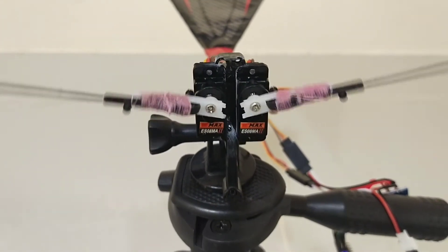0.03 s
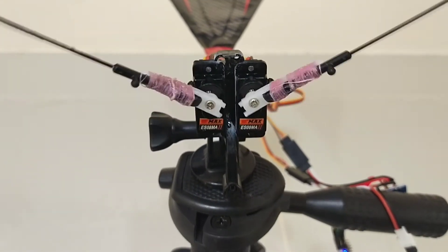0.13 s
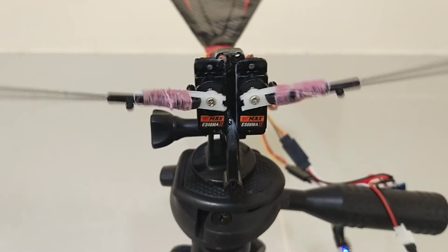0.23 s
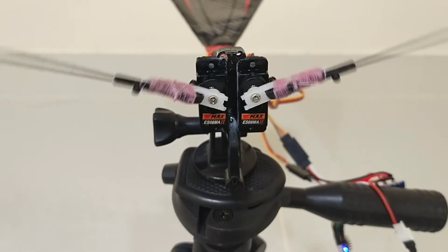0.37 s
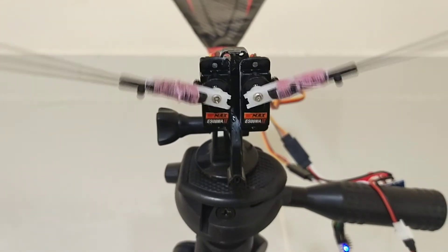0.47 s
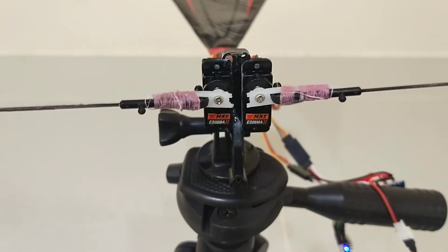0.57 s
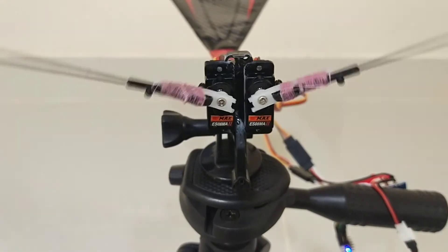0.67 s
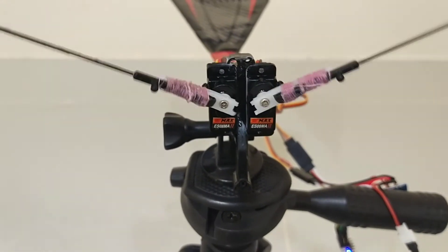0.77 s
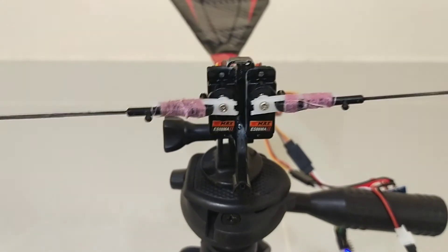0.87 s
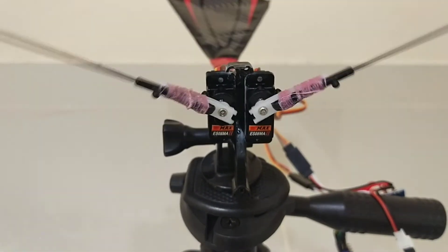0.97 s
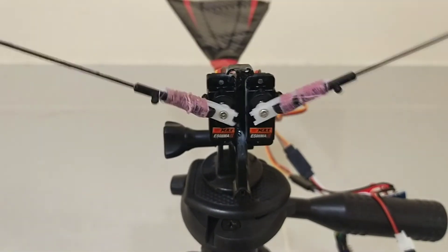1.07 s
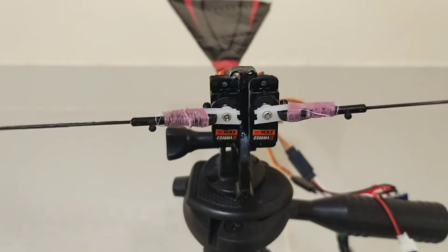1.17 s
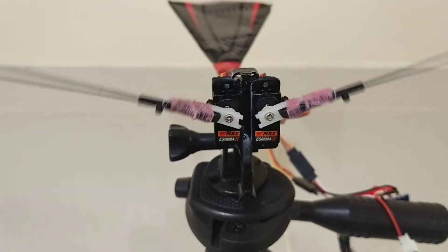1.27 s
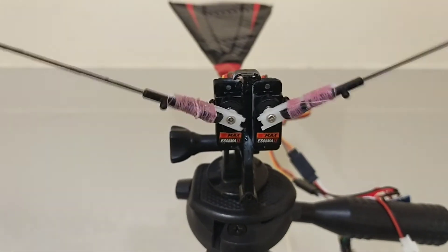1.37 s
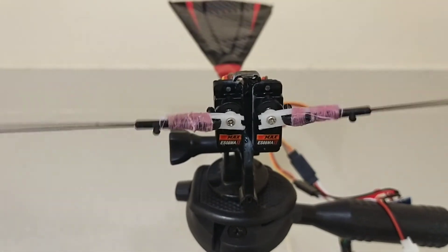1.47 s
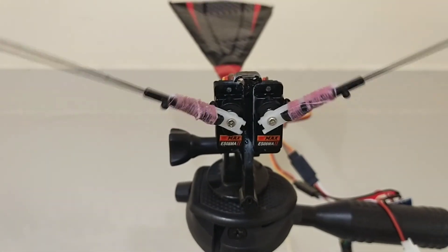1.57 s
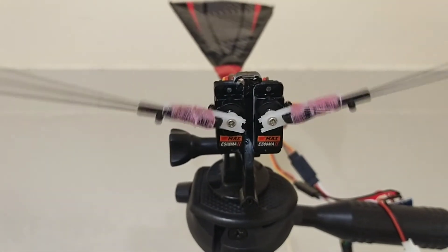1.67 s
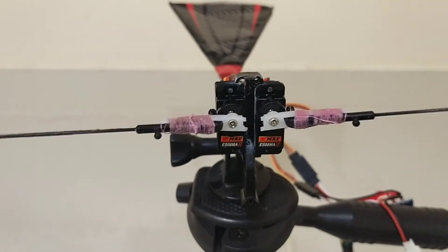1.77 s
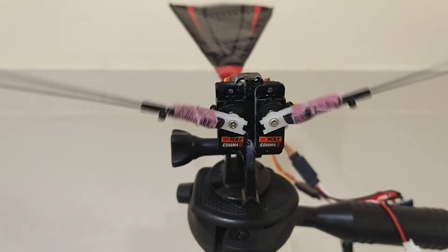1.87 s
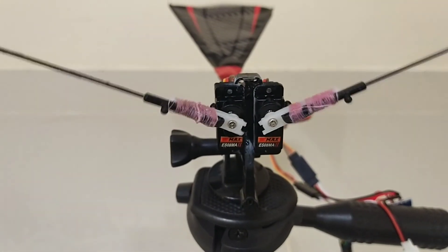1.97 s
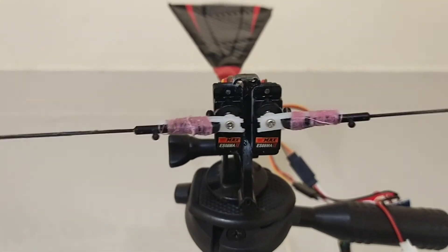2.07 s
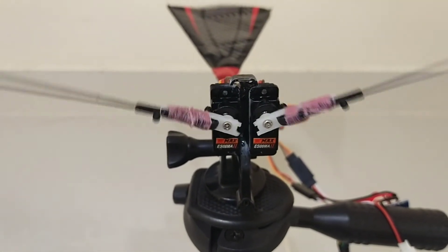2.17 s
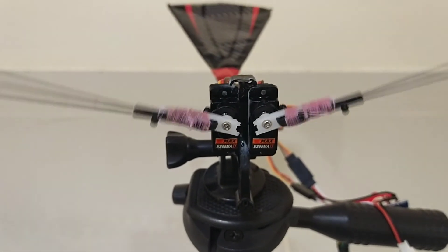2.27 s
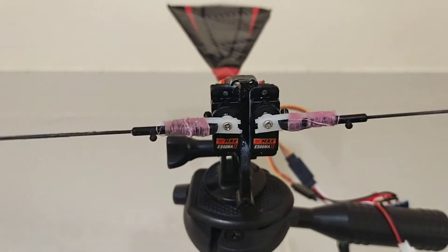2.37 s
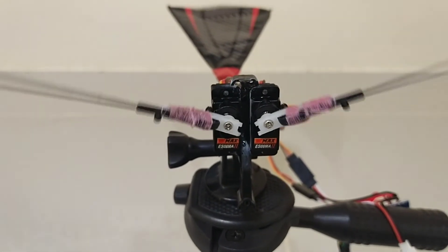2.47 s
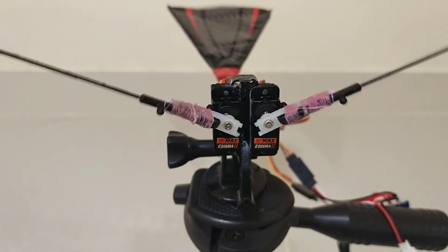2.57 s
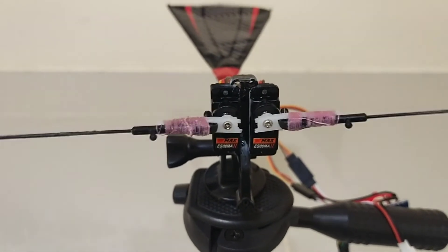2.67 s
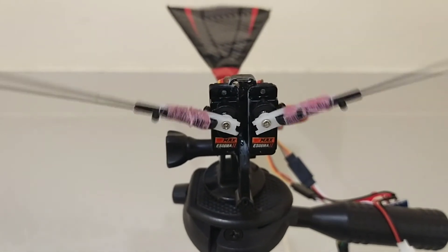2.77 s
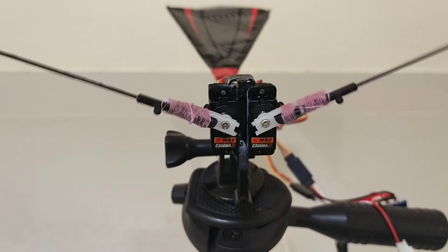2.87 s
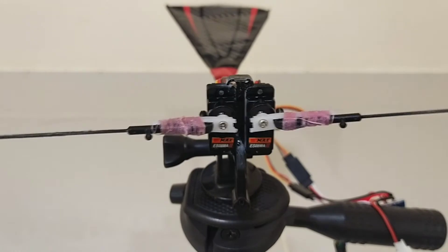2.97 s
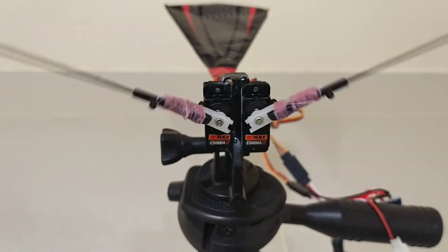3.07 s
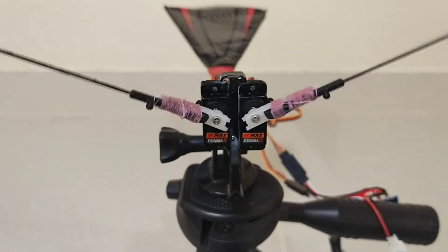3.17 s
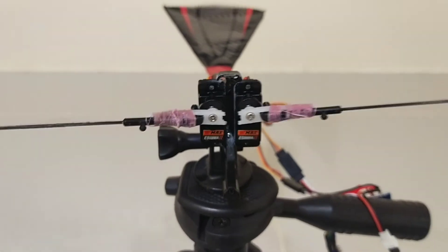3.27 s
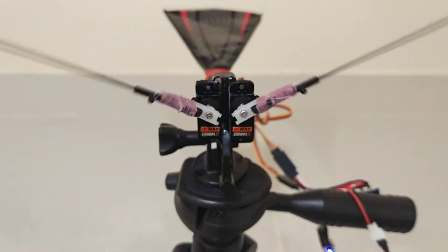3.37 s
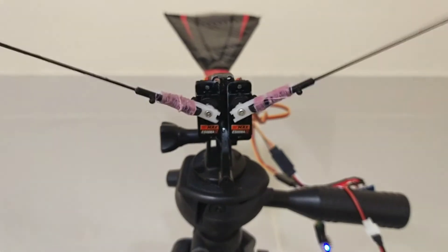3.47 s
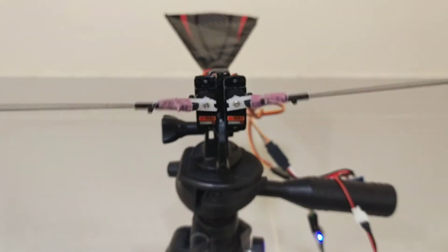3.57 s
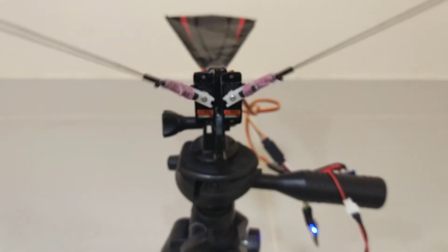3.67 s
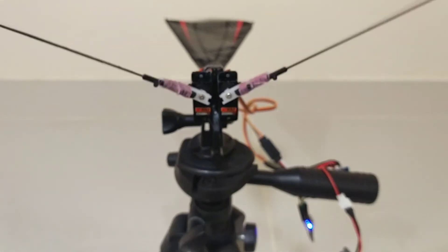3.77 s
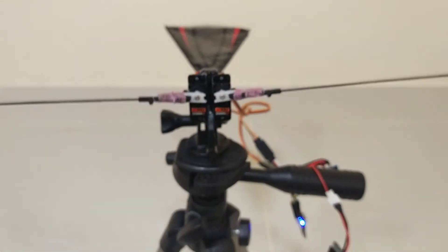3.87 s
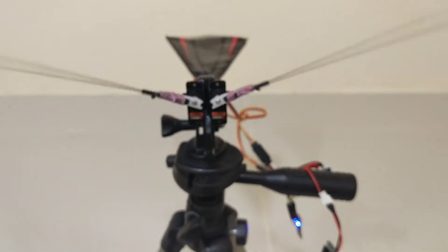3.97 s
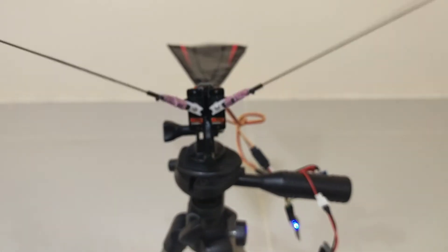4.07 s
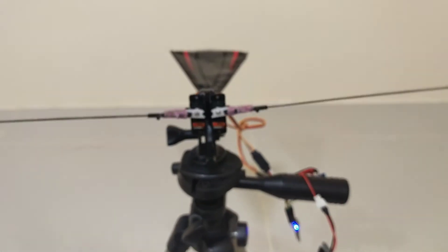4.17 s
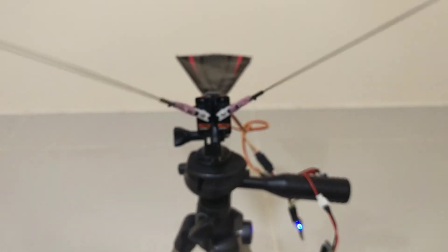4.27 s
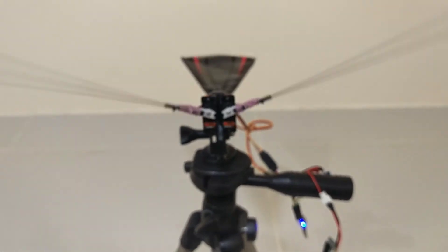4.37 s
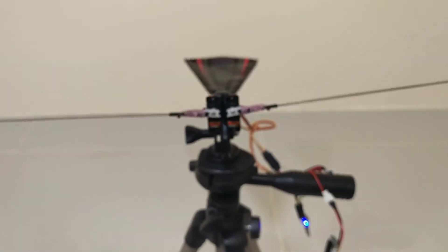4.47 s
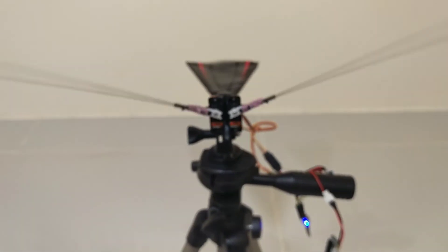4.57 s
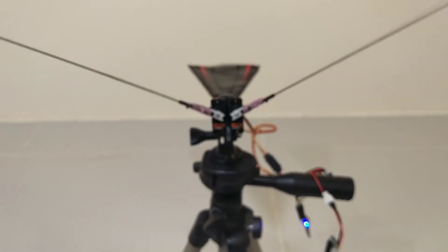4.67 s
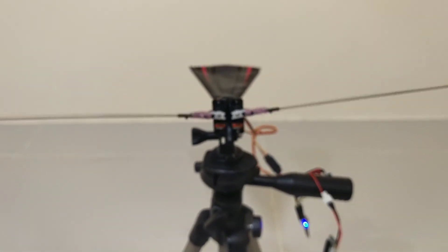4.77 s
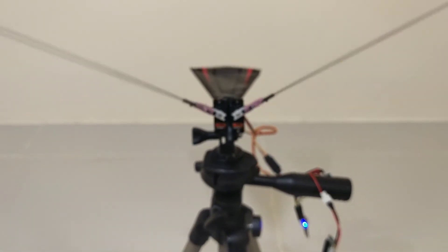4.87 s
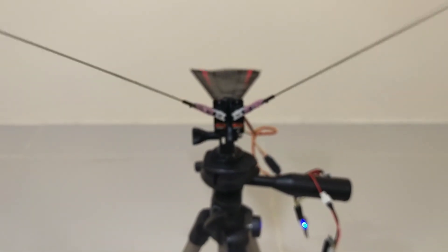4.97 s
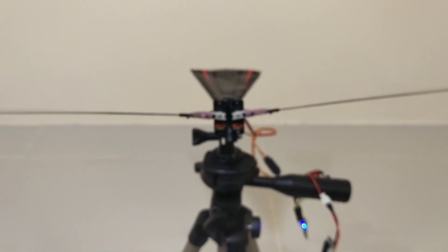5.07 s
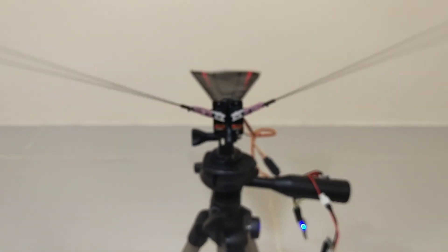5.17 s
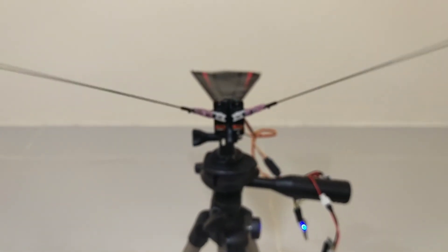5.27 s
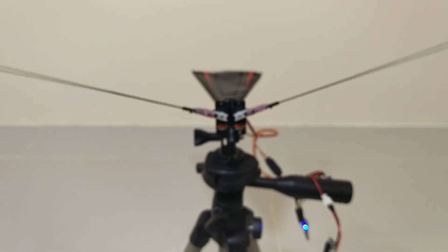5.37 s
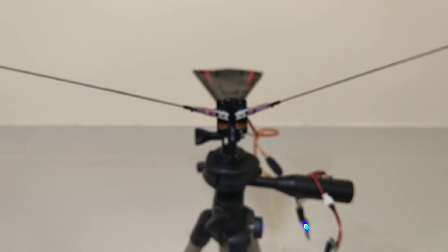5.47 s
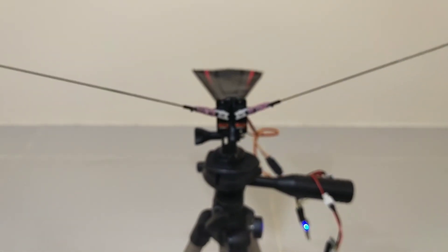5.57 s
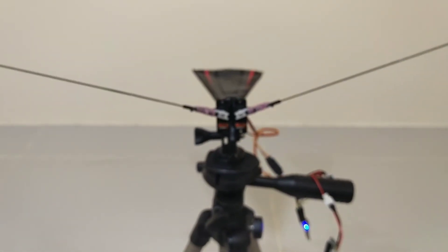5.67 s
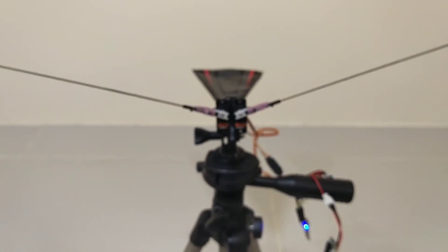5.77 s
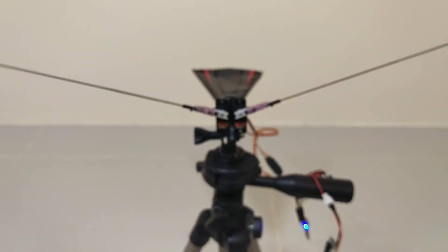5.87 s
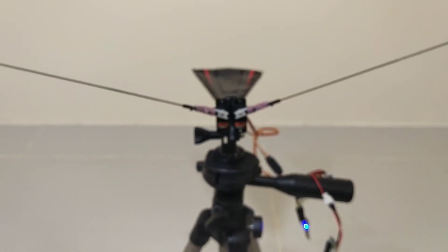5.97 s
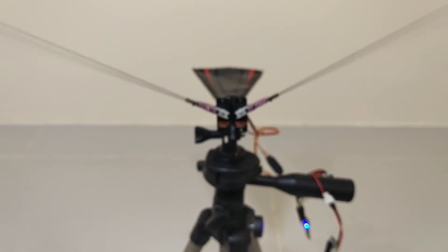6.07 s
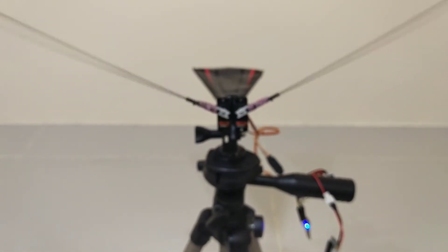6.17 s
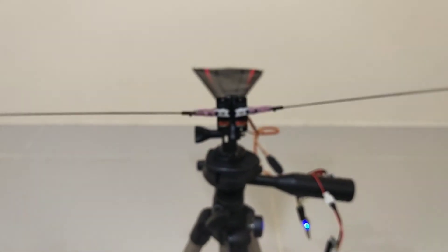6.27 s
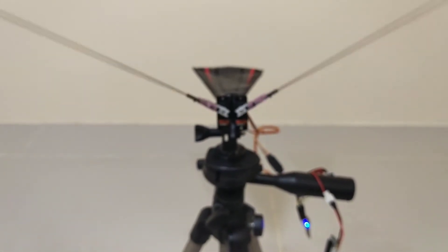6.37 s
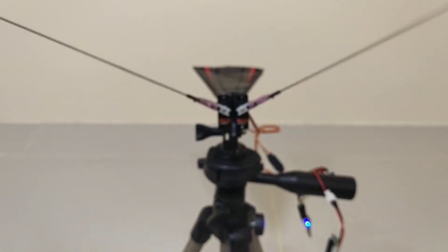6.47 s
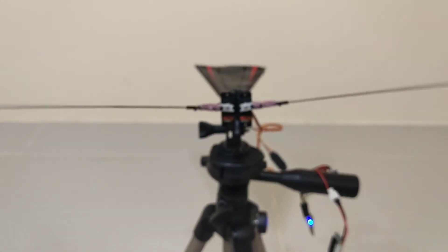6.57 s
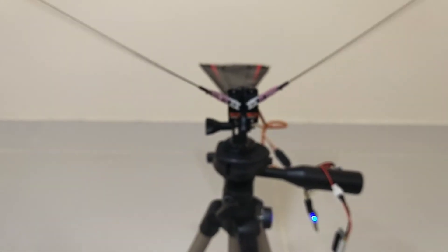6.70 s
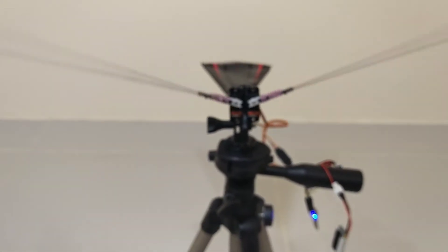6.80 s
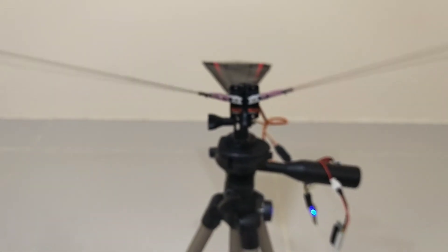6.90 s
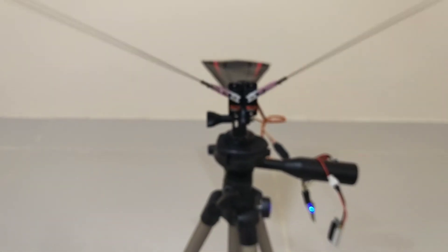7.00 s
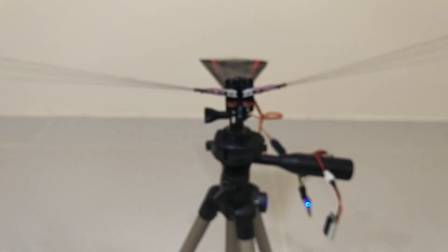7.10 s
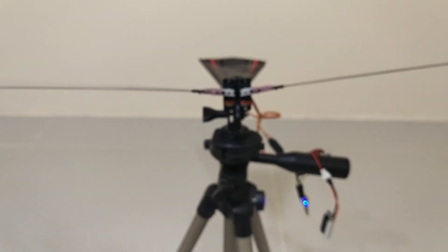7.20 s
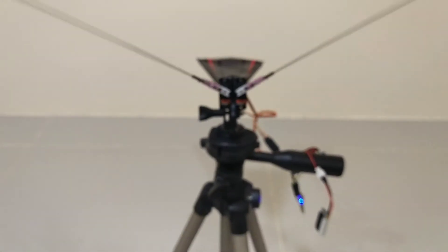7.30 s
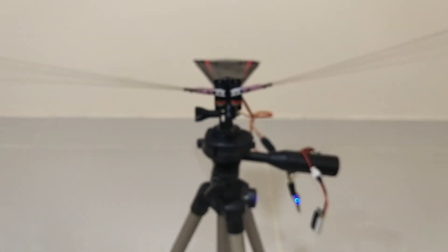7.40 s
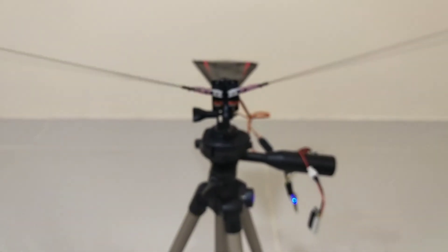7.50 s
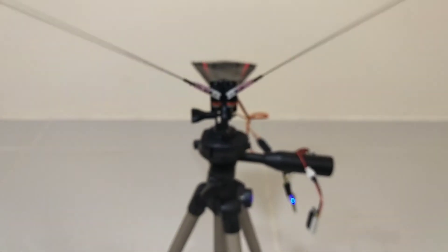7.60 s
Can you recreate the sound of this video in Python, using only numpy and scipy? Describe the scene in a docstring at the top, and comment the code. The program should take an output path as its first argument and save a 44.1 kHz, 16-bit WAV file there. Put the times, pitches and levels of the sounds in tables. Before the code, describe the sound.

From 0 s, two micro servos drive a pair of thin spars up and down close to a hand-held stereo phone in a bare room. The sound is a loud, dry, gritty buzz, about three full flaps a second, each with two uneven whirring bursts as the motors spin up and brake. Bright ringing of plastic cases around 7 to 8 kHz and fizzing gears dominate, overloading slightly. From about 2.4 s the rasp steadily softens as the phone retreats, becoming much quieter by 4 to 5 s. Around 5.15 s the motors cut and coast down, leaving steady hush, soft low floor rumble with muffled thuds, a faint hum near 5.4 s and tiny gear whispers. At about 5.97 s the flapping snaps back, swelling by 6.3 s, somewhat more even and still below the opening loudness, continuing until cut off near 7.6 s.

```python
"""First a close, buzzing flap-flap: two micro servos swing a pair of wing spars up and down, in a bare room.
A hand-held phone with two microphone ports backs away; the servos stop briefly, then restart louder.
In every stroke the motors spin up and brake; gear noise pulses once and three times a turn and rings
plastic cases and frame. Behind it lie a soft floor rumble with thuds, a steady hush and one faint hum.
The room answers, and the loudest strokes push the phone's input into gain control and clipping."""
import sys
import numpy as np
from scipy import signal
from scipy.fft import rfft, irfft, next_fast_len
from scipy.io import wavfile
from scipy.ndimage import uniform_filter1d, map_coordinates

SR = 44100
rng = np.random.default_rng(int(sys.argv[2]) if len(sys.argv) > 2 else 0)


def wrap_up_sound(samples):
    """Save the sound to the file named by the first command line argument, as 16-bit audio."""
    columns = np.atleast_2d(samples).T
    # keep every value between -1 and 1, then stretch to whole-number steps
    tamed = np.clip(columns, -1, 1)
    steps = np.round(tamed * 32767).astype(np.int16)
    wavfile.write(sys.argv[1], SR, steps)


N = 336924
TIME = np.arange(N) / SR  # s


def amp(db):
    """Level in dB to amplitude factor."""
    return np.exp(np.asarray(db) * np.log(10) / 20)


def unit(x):
    """Scale each row to an RMS of one."""
    return x / np.sqrt(np.mean(x ** 2, axis=-1, keepdims=True) + 1e-20)


def along(points, hz):
    """Read (f/Hz, value) points on a log frequency axis."""
    f, v = np.transpose(points)
    return np.interp(np.log(hz + 1), np.log(f + 1), v)


def curves(rows, t=TIME):
    """One value per sample for each column after the time."""
    seconds, *columns = np.transpose(rows)
    return [np.interp(t, seconds, column) for column in columns]


def wobble(rate, channels=1):
    """Random curves with `rate` knots a second, joined by straight lines."""
    knots = rng.standard_normal((channels, int(N * rate / SR) + 2))
    return np.array([np.interp(TIME * rate, np.arange(len(k)), k) for k in knots])


def swells(rows):
    """Sum of humps, each 10 dB under its peak one rise before and one fall after it."""
    total = np.zeros(N)
    for peak_s, db, rise, fall in rows:
        distance = np.where(TIME < peak_s, (peak_s - TIME) / rise, (TIME - peak_s) / fall)
        total += amp(db - 10 * distance)
    return total


def filtered(x, response):
    """Multiply the spectrum of x by a complex response of frequency."""
    m = next_fast_len(N + SR // 2)
    return irfft(rfft(x, m) * response(np.fft.rfftfreq(m, 1 / SR)), m)[..., :N]


def resonances(modes):
    """Responses of (f/Hz, width/Hz, level/dB, ..) modes, one per level column; each mode acts twice: steep skirts."""
    def response(f):
        total = 0
        for k, (centre, width, *db) in enumerate(modes):
            damping = 1j * f * width * np.sqrt(2)  # widened, since squaring narrows the peak
            mode = (damping / (centre * centre - f * f + damping)) ** 2
            total = total + amp(db)[:, None, None] * mode * (-1) ** k  # neighbours alternate in sign
        return total
    return response


# Footsteps and handling thuds: t/s of the peak, level/dB before the left-right lean, rise t/s, fall t/s
STEPS_AND_HANDLING = [(.06, -48, 0.084, 0.073), (.4, -51.5, 0.086, 0.17), (1.05, -59, 0.087, 0.069),
                      (1.54, -52, .04, 0.047), (2.7, -53.5, 0.21, 0.4), (3.58, -61, 0.03, 0.22),
                      (4.21, -64, 0.084, 0.13), (4.82, -62.5, 0.22, 0.057), (5.02, -54, 0.044, 0.11),
                      (5.28, -55.5, .07, 0.087), (5.58, -60.5, 0.088, 0.36), (6.47, -54, 0.086, 0.13),
                      (6.94, -57.5, 0.042, .12), (7.34, -54, 0.056, 0.21)]
# Colour of the floor rumble: f/Hz, relative level/dB per Hz
RUMBLE_COLOUR = [(20, -41.5), (35, -11.5), (55, 3), (90, 1), (135, -3.5), (200, -25), (300, -51)]
RUMBLE_DB, RUMBLE_SWAY_DB = -74, 5  # before the lean


def floor_rumble():
    """Low-passed noise, nearly alike at both ports, sways in level and swells with every step or bump."""
    a = rng.standard_normal((2, N))
    nearly_alike = a[0] + 0.32 * a[1] * [[1], [-1]]
    level = swells(STEPS_AND_HANDLING) + amp(RUMBLE_DB + RUMBLE_SWAY_DB * wobble(4.1))
    return level * unit(filtered(nearly_alike, lambda hz: amp(along(RUMBLE_COLOUR, hz))))


# Colour of the steady hush: f/Hz, relative level/dB per Hz
HUSH_COLOUR = [(25, -47), (60, -6.5), (130, -5), (250, -8), (500, -17.5), (850, -27.5), (1500, -26),
               (1950, -22), (2150, -8), (2400, -23.5), (5000, -23), (9000, -28), (11000, -21.5),
               (12500, -29), (15600, -31.5)]
# How alike the hush is at the two ports: f/Hz, left-right likeness (1 = same)
HUSH_LIKENESS = [(60, 1), (250, 0.73), (600, .1)]
HUSH_DB = -65.5  # before the lean


def steady_hush():
    """Coloured noise; mid and side shares set how alike the ports are at each frequency."""
    angle = lambda hz: np.arccos(np.clip(along(HUSH_LIKENESS, hz), -1, 1)) / 2
    shares = lambda hz: amp(along(HUSH_COLOUR, hz)) * [np.cos(angle(hz)), np.sin(angle(hz))]
    mid, side = filtered(rng.standard_normal((2, N)), shares)
    return amp(HUSH_DB) * unit(np.array([mid + side, mid - side]))


# The faint hum's swell: t/s of the peak, level/dB before wavering and lean, rise t/s, fall t/s
HUM_SWELL = [(5.37, -62.5, 0.041, 0.15)]
HUM_HZ, HUM_SAG_HZ_PER_S, HUM_BLUR_HZ = 500, 60, 30  # pitch at the peak, fall, random spread


def faint_hum():
    """One sine whose pitch sags and jitters while its strength wavers."""
    hum_hz = HUM_HZ - HUM_SAG_HZ_PER_S * (TIME - HUM_SWELL[0][0]) + HUM_BLUR_HZ * wobble(140)[0]
    waver = 1.15 + 0.8 * wobble(90)
    return swells(HUM_SWELL) * waver * np.sin(2 * np.pi * np.cumsum(hum_hz) / SR)


def background():
    """Rumble, hush and hum add up, stronger at the left port."""
    left_right_lean = amp([[1.6], [-1.6]])
    return (floor_rumble() + steady_hush() + faint_hum()) * left_right_lean


# The bare room's walls: f/Hz, decay t/s for 60 dB, level of the answer/dB
WALL_ANSWER = [(1004, 0.63, -7), (2523, 0.16, -4), (6830, 0.26, -9.5), (15000, 0.35, -17.5)]


def room(x):
    """Decaying noise as echoes: each frequency has its own strength and dies at its own speed."""
    hz, t, z = signal.stft(rng.standard_normal((2, SR // 2)), SR, nperseg=256)
    t60 = along([(f, s) for f, s, _ in WALL_ANSWER], hz)[:, None]
    decay = amp(-60 * t / t60) / np.sqrt(t60)  # long tails start softer
    tail = signal.istft(z * decay, SR, nperseg=256)[1]
    answer = signal.fftconvolve(x, unit(tail) / np.sqrt(tail.shape[1]), axes=1)[:, :N]
    return filtered(answer, lambda hz: amp(along([(f, db) for f, _, db in WALL_ANSWER], hz)))


# Stopped servos hunt faintly: t/s of the peak, level/dB before a 6 dB lift, rise t/s, fall t/s
HUNTING = [(5.35, -64.5, 0.068, 0.39), (5.8, -58, 0.048, 0.065)]


def creep():
    """While stopped, the gears still whisper: noise through the strongest case resonances."""
    whisper = resonances([(7500, 380, -1.8), (8030, 310, -0.18)])
    return swells(HUNTING) * amp(6.0) * unit(filtered(rng.standard_normal((2, N)), whisper)[0])


def rattle(turn, once, thrice, patchy_db):
    """Gear noise swelling once and three times a motor turn; its spectrum is randomly uneven."""
    z = signal.stft(rng.standard_normal(turn.shape), nperseg=1024)[2]
    patches = uniform_filter1d(rng.standard_normal(z.shape[1:]), size=4, axis=1)
    patchy = z * amp(patchy_db * patches / patches.std())
    noise = signal.istft(patchy, nperseg=1024)[1][:, :N]
    return noise * (1 + once * np.cos(turn) + thrice * np.cos(3 * turn))


# The brush whine returns slowly after the restart: t/s, level/dB over the commutator's own
WHINE_RETURN = [(5.9, 0), (5.95, -12), (6.3, -5.5), (7.6, -3)]


def commutator(turn):
    """Three segments pass the brushes each turn; weaker whines sound at higher orders."""
    whine = 0.23 * np.sin(3 * turn) * amp(3 * wobble(74, channels=3))
    whine = whine + 0.064 * np.sin(5 * turn) + 0.032 * np.sin(8 * turn)
    return amp(curves(WHINE_RETURN)[0]) * whine


# One flap, up then down: t/s into the flap, motor turns f/Hz before each part's own factor,
# swell level/dB in the first colour, in the second colour (both before each layer's depth)
FLAP_CYCLE = [(0, 202, -15, -5), (.015, 117.5, -15.5, -5.5), (.035, 200.6, -4.5, -6.5), (.07, 264, 1, -0.5),
              (.088, 307, -0.5, -2.5), (.107, 310.4, 4.5, 3.5), (.125, 301, 2, 5), (.14, 275, -6, -0.5),
              (.158, 110, -20.5, -1), (.175, 149, -3, -11.5), (.192, 200, -1.5, -3.5), (.21, 243, -0.5, -6),
              (.245, 289.5, 2.5, -1), (.262, 288.3, -0.5, -2.5), (.282, 269.6, 3.5, 1.5),
              (.3, 198.5, -5, -5)]
FLAP_S, FLAP_START_S, UP_S = .3, .085, 0.17  # period, start, length of the upstroke
# Motor power around the stop: t/s, level/dB
STOP_POWER = [(5.13, 1.5), (5.155, -18.5), (5.185, -14), (5.2, -9), (5.215, -15), (5.27, -19.5),
              (5.42, -57), (5.955, -53.5), (5.975, -17.5), (6.0, -2.5), (6.03, -0.5), (6.08, -2)]
STOP_S, PAUSE_SWITCH_S = 5.2, 5.5
# from the switch in the pause on: strokes lead, swells are shallower
AGAIN_EARLY_S, AGAIN_DEPTH = 0.0076, 0.61
# Loudness of the rig at the phone: t/s, rings and frame level/dB, gear fizz level/dB
RIG_LEVEL = [(0, -16, -13.5), (.9, -16, -11.5), (1.4, -15.5, -11.5), (2.25, -15.5, -11), (2.45, -19, -13),
             (2.6, -22.5, -17), (2.9, -26, -20.5), (3.3, -26.5, -22), (3.7, -30.5, -24), (4.1, -33, -28),
             (4.5, -32, -29), (4.8, -32.5, -30), (5.2, -34, -31), (5.9, -24, -19.5), (6.3, -19.5, -17.5),
             (6.7, -19.5, -17.5), (7.2, -20, -18), (7.6, -20, -19)]
# Rows lower ring, upper ring, fizz, frame: (first, second colour) level/dB over the loudness,
# (first, second colour) upstroke over downstroke level/dB, depth of the swell (factor)
LAYER_BALANCE = [((0, 0), (1.56, 1.5), 1.24), ((3.9, 5.9), (0.56, -10), 1.17), ((0.1, 0.13), (-1.2, -7.5),
                 1.21), ((-17.5, -18.5), (0.3, -3.1), 0.86)]


def strokes(second_share):
    """Motor speed and the gain of each layer: every flap repeats one swell, up and down differ by layer."""
    again = TIME > PAUSE_SWITCH_S
    phase = (TIME - FLAP_START_S + AGAIN_EARLY_S * again) % FLAP_S
    turns_hz, first_db, second_db = curves(FLAP_CYCLE, phase)
    blend = lambda first, second: first + second_share * (second - first)
    depth_now = np.where(again, AGAIN_DEPTH, TIME < STOP_S)  # coasting motors no longer swell
    swell_db = blend(first_db, second_db) * depth_now
    upstroke = (phase > .012) & (phase < UP_S + .005)
    up = uniform_filter1d(upstroke, size=SR // 100, output=float) - .5  # +.5 up, -.5 down
    ring_db, fizz_db = curves(RIG_LEVEL) + curves(STOP_POWER)[0]
    gains = []
    for db, (over, lift, depth) in zip((ring_db, ring_db, fizz_db, ring_db), LAYER_BALANCE):
        gains.append(amp(db + blend(*over) + up * blend(*lift) + depth * swell_db))
    return turns_hz, gains


def spread(x, alike, tilt_db):
    """Three unrelated parts to four paths: the first goes to both ports, the others to one port each."""
    sides = amp(np.array([tilt_db, -tilt_db]) / 2)
    sides = sides / np.sqrt(np.mean(sides ** 2, axis=0))
    return np.array([np.sqrt(alike) * x[0] * sides, np.sqrt(1 - alike) * x[1:] * sides])


# The phone's aim: t/s, lead of the left port t/us, left over right level/dB of the upper ring, of the fizz
PHONE_AIM = [(0, -68, -1, 6), (1.2, -41.5, -3.1, 6), (2.4, -45.5, -3.5, 7.5), (3.3, -62.5, -6, 8.5),
             (4.3, -12, -0.5, 9), (5, 7.5, 1.5, 8.5), (6, -3.5, 0.5, 7.5), (6.8, 18, -1, 7.5),
             (7.6, -31, 0.5, 8.5)]
# Phase between the microphone ports: f/Hz, radians by which the left leads
PORT_PHASE = [(1000, 0), (4600, -0.7), (5700, 0.25), (6900, -2.5), (8400, -1.47), (10900, 0), (12000, -5),
              (13500, -2), (15200, -2)]


def ports(paths):
    """The shared part reaches one port ahead of the other, by the phone's aim."""
    shared, separate = paths
    lead = curves(PHONE_AIM)[0] * SR / 10 ** 6  # samples
    turned = lambda hz: np.exp(.5j * along(PORT_PHASE, hz) * np.array([[1], [-1]]))
    pair = filtered(shared, turned)
    shifted = [map_coordinates(p, [np.arange(N) + way * lead / 2], order=4) for p, way in zip(pair, (1, -1))]
    return separate + shifted


# Share of the second colour, 0 first to 1 second; mostly the first again after the restart: t/s, cases, frame
SECOND_COLOUR = [(2.3, 0.017, 0.024), (3.3, 0.58, 0.36), (4.5, 0.85, 1), (5.5, 1, 0.94), (6, 0.25, 0.35),
                 (7.6, 0.34, 0.33)]
# Resonances of frame and cases: f/Hz, width/Hz, relative level/dB in the first colour, in the second
FRAME_MODES = [(634, 230, -25, -24), (932, 140, -11.5, -11), (1153, 460, -21, -21.5),
               (1496, 225, -14, -18.5), (2010, 247, -10, -6.5), (2456, 168, -1, -1), (3000, 660, -6, -9),
               (3758, 420, -3.5, -9), (4590, 530, 2.5, -2.5)]
LOWER_RING_MODES = [(5254, 780, -16.5, -17), (5970, 640, -9, -11), (6555, 530, -5, -6),
                    (7096, 256, 2.5, 2.5)]
UPPER_RING_MODES = [(7515, 253, 2, -6.5), (7834, 150, -4, 0.5), (7760, 320, -2, -8.5),
                    (8088, 192, -1, -0.5), (8486, 350, -3.5, -3), (9274, 1100, -11, -12)]
FIZZ_MODES = [(10354, 940, -3.5, -2), (11237, 590, -3, -2), (12260, 960, 1, -6), (13570, 290, -4, -1.5),
              (14460, 900, 1.5, -7), (15000, 430, -24, -3)]


def servos():
    """Gear rattle and brush whine drive the resonances of case and frame, stroke by stroke."""
    case_share, frame_share = curves(SECOND_COLOUR)
    turns_hz, (lower_gain, upper_gain, fizz_gain, frame_gain) = strokes(case_share)
    speed = [[1.03], [1.07], [.99]] + .015 * wobble(15, channels=3)  # never quite in step
    turn = 2 * np.pi * np.cumsum(turns_hz * speed, axis=1) / SR
    ring_tilt, fizz_tilt = curves(PHONE_AIM)[1:]
    flat = np.ones(N)

    def sound(modes, drive, second_share=case_share):
        """Crossfade from the first to the second colour."""
        first, second = unit(filtered(drive, resonances(modes)))
        return (1 - second_share) * first + second_share * second

    def shake(db):
        """The load on the teeth is never even."""
        return amp(db * wobble(23))

    lower = sound(LOWER_RING_MODES, rattle(turn, 0.24, 0.1, patchy_db=4.0))
    upper = sound(UPPER_RING_MODES, rattle(turn, 0.13, 0.096, patchy_db=5.0))
    fizz = sound(FIZZ_MODES, rattle(turn, 0.56, 0.17, patchy_db=1.0))
    frame_drive = rattle(turn, 0.1, 0.092, patchy_db=6.5) + commutator(turn)
    frame = sound(FRAME_MODES, frame_drive, frame_share)

    paths = lower_gain * shake(1.2) * spread(lower, 0.39, 4.4 * flat)
    paths = paths + upper_gain * shake(1.2) * spread(upper, 0.61, ring_tilt)
    paths = paths + fizz_gain * shake(.9) * spread(fizz, 0.36, fizz_tilt)
    paths = paths + frame_gain * shake(0.45) * spread(frame, 0.77, 2.25 * flat)
    return ports(paths)


def scene():
    """The servos with the room's answer, over their whisper at rest and the background."""
    rig = servos()
    return background() + creep() + room(rig) + rig


CLIP_TOP, CLIP_KNEE = 0.86, 6.8  # ceiling (amplitude), sharpness of the bend
TOP_HZ = 15700  # band limit


def record(dry):
    """Gain control turns loud moments down, the input clips remaining peaks, and the band limit cuts the top."""
    power = uniform_filter1d(np.mean(dry ** 2, axis=0), size=SR // 50)  # 20 ms mean
    loud_db = 10 * np.log10(np.abs(power) + 1e-12)
    eased = dry * amp(-.4 * np.maximum(loud_db + 18.5, 0))  # 0.4 dB down per dB above -18.5 dB
    clipped = eased / (1 + np.abs(eased / CLIP_TOP) ** CLIP_KNEE) ** (1 / CLIP_KNEE)
    return np.clip(filtered(clipped, lambda hz: hz < TOP_HZ), -1, 1)


dry = scene()
out = record(dry)
wrap_up_sound(out)
```